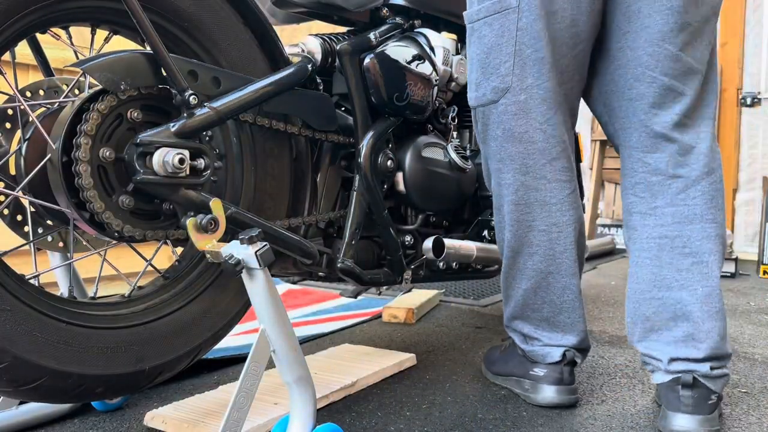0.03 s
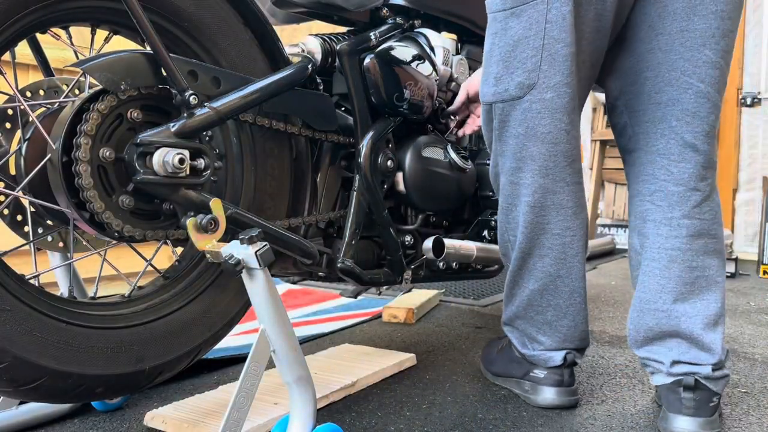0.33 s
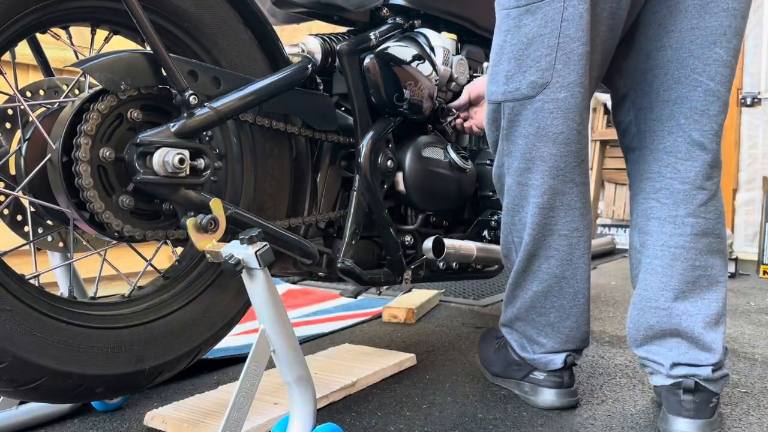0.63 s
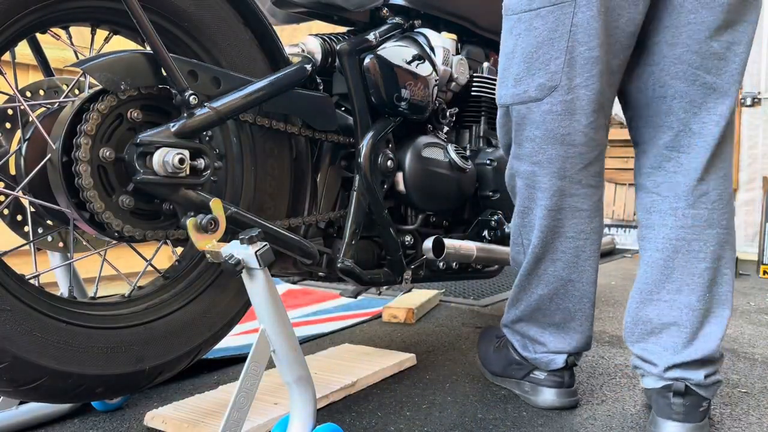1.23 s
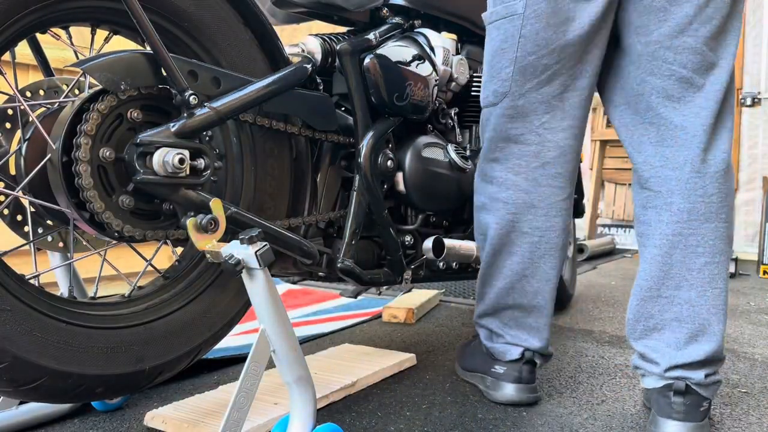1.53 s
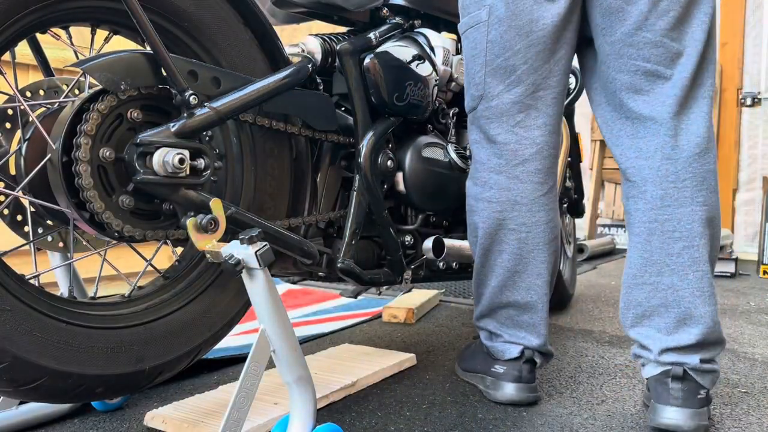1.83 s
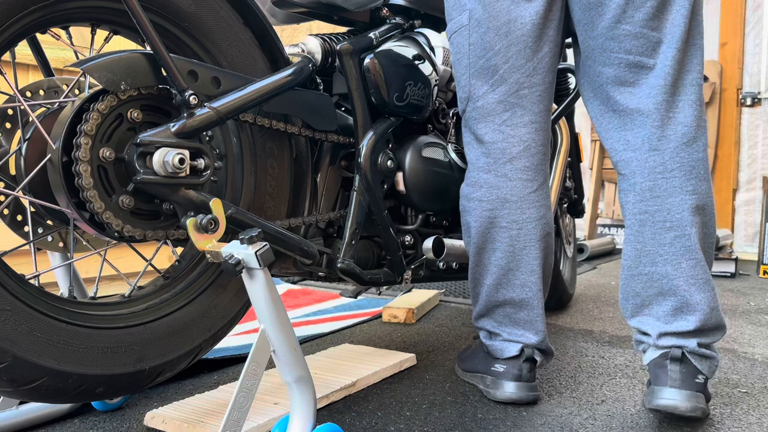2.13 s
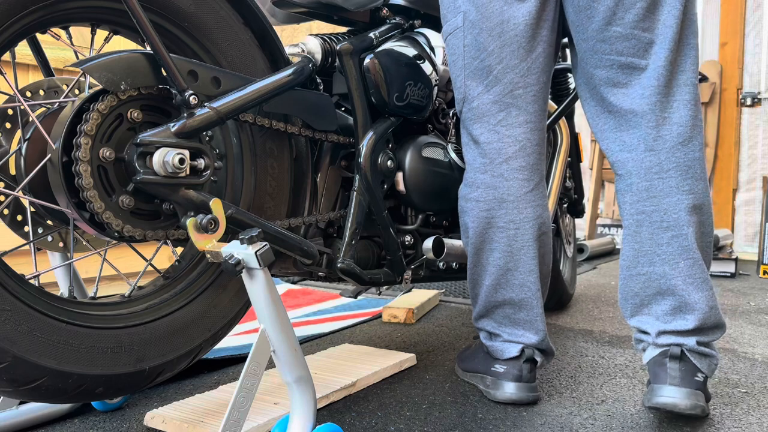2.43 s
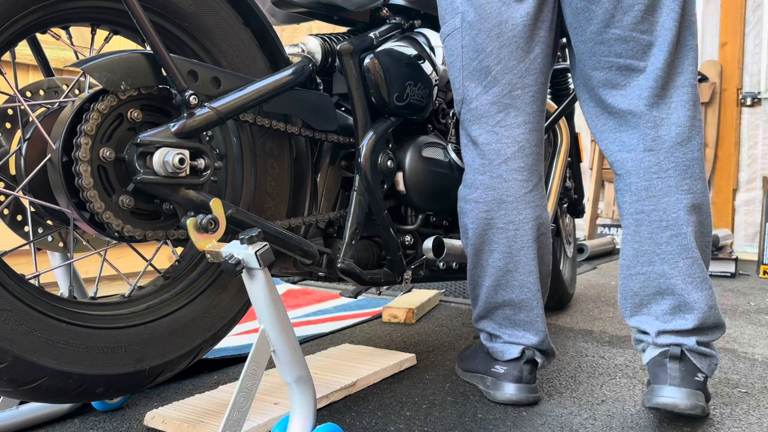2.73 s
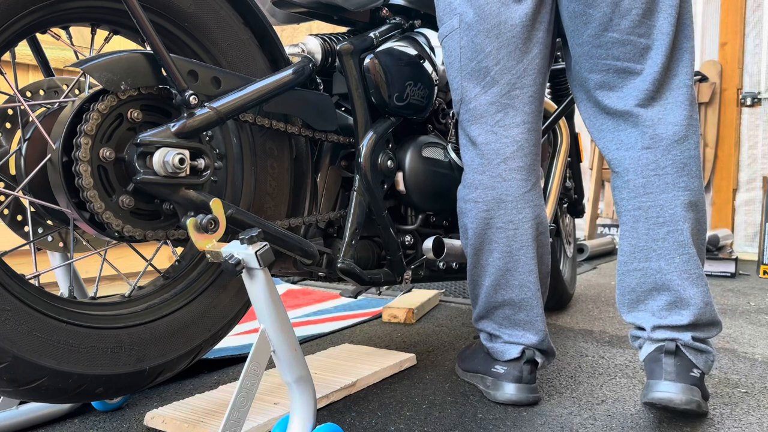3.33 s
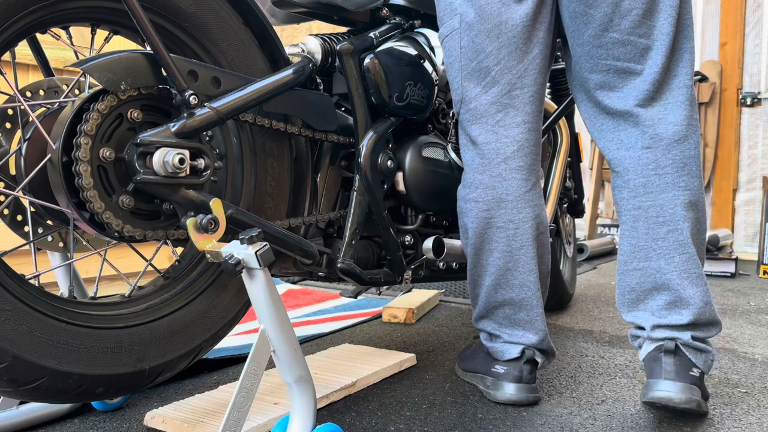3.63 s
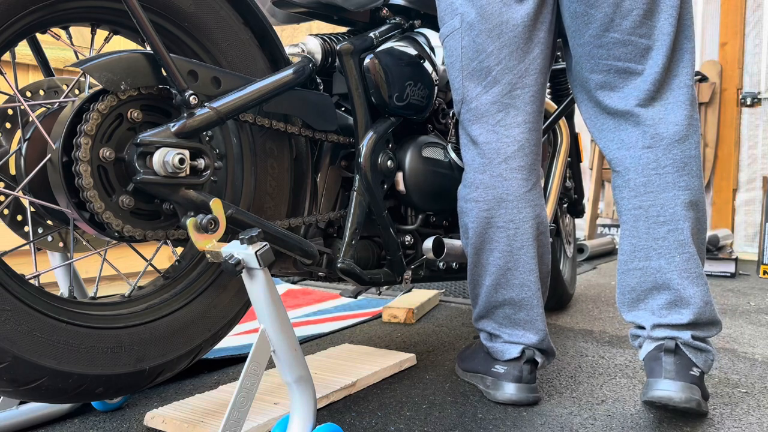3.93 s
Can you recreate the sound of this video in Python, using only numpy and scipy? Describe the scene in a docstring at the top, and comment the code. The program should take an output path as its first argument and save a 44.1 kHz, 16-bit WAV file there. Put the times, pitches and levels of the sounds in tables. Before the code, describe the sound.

A motorcycle is switched on, whirrs faintly with clicks, then its starter cranks loudly.

```python
"""A motorcycle switched on and cranked in a yard, a little left of a stereo microphone.
Key and relays click, the pump whirrs and the electrics whine. At 3.56 s the solenoid snaps in and the
starter gears grind against the casing, slowing on each compression, while the cylinders thump through
the pipes. Behind it are a low distant rumble, still air and two faint, far chirps."""
import sys
import numpy as np
from scipy import signal
from scipy.fft import rfft, irfft
from scipy.io import wavfile

SR = 44100
rng = np.random.default_rng(int(sys.argv[2]) if len(sys.argv) > 2 else 0)


def file_out(sig):
    """Save sig as 16-bit WAV at sys.argv[1]."""
    # one column per channel
    cols = np.atleast_2d(sig).T
    # limit, then scale
    lim = np.clip(cols, -1, 1)
    pcm = np.round(lim * 32767).astype(np.int16)
    wavfile.write(sys.argv[1], SR, pcm)


N = 176400
T, HZ = np.arange(N) / SR, np.fft.rfftfreq(2 * N, 1 / SR)
POWER_ON_S = 1.04


def amp(db):
    """Decibels to gain."""
    return 10 ** (np.asarray(db) / 20)


def unit(x):
    """Scales to rms 1."""
    return x / np.sqrt(np.mean(x ** 2) + 1e-20)


def curve(rows, column=1):
    """One column of a table through time."""
    rows = np.array(rows)
    return np.interp(T, rows[:, 0], rows[:, column])


def spectrum(rows, hz):
    """A table interpolated on a log-frequency axis."""
    freqs, values = np.transpose(rows)
    return np.interp(np.log(hz + 1), np.log(freqs + 1), values)


def shape(x, gain):
    """Filters by a frequency response."""
    return irfft(rfft(x, 2 * N) * gain)[..., :N]


def band(x, lo_hz, hi_hz):
    """Causal band-pass."""
    return signal.sosfilt(signal.butter(2, [lo_hz, hi_hz], 'band', fs=SR, output='sos'), x)


def wander(hz):
    """Random motion of rms 1, mostly slower than hz."""
    return unit(shape(rng.standard_normal(N), 1 / (1 + (HZ / hz) ** 4)))


def add(mix, start_s, sound):
    """Mixes a sound in at a time."""
    part = mix[round(start_s * SR):][:len(sound)]
    part += sound[:len(part)]


def wash(colour, alike_hz):
    """Diffuse noise, alike in both channels below alike_hz."""
    common, apart = rng.standard_normal((2, N))
    coherence = .25 + .75 / (1 + (HZ / alike_hz) ** 2)
    gain = amp(spectrum(colour, HZ))
    right = shape(common, gain * coherence) + shape(apart, gain * np.sqrt(1 - coherence ** 2))
    return unit(np.array([shape(common, gain), right]))


def yard(x, wet_db):
    """Direct sound from slightly left, quick reflections off bike and ground, and a short tail."""
    # reverberation of the yard: f/Hz, t60/s
    decay = [(100, 0.55), (500, 1), (2000, 0.51), (6000, 0.32), (14000, 0.32)]
    n, right_lag_s = SR // 2, 33e-6
    t = np.arange(n) / SR
    late, early = rng.standard_normal((2, 2, n)) * (rng.random((2, 2, n)) < .1) * (t > .002)
    hz, frame_s, frames = signal.stft(late, SR, nperseg=256)
    tail = signal.istft(frames * amp(-60 * frame_s / spectrum(decay, hz)[:, None]), SR, nperseg=256)[1]
    echo = (amp(wet_db) * unit(tail[:, :n]) + amp(-5) * unit(early * np.exp(-t / .016))) / np.sqrt(n)
    direct = np.array([x, shape(x, np.exp(-2j * np.pi * np.minimum(HZ, 8000) * right_lag_s))])
    return (direct + signal.fftconvolve(x[None], echo, axes=1)[:, :N]) * amp([[1], [-1]])


def background():
    """A distant rumble that dips briefly twice, under the soft hiss of still air."""
    # course of the rumble: t/s, level/dB
    rumble_level = [(0, -44), (.85, -47.5), (1.5, -48), (1.95, -49.5), (2.15, -47.5), (2.21, -56),
                    (2.3, -45.5), (2.7, -48.5), (2.77, -56.5), (3.38, -51), (3.45, -46)]
    # spectra of rumble and air: f/Hz, level/dB
    rumble_colour = [(20, -37), (36, 1), (54, 15.5), (70, 9), (88, 8), (120, -4.5), (200, -32), (400, -90)]
    air_colour = [(76, -10), (130, 0), (412, -7.5), (554, -13), (1130, -15.5), (1440, -18), (3450, -29),
                  (4210, -39), (6780, -27), (15000, -45)]
    rumble = wash(rumble_colour, alike_hz=850) * amp(curve(rumble_level))
    return rumble + wash(air_colour, alike_hz=413) * amp(-59.5 + .5 * wander(12))


def clicks():
    """Key, relays, solenoid and dull knocks: bursts of contact noise, each with one resonance."""
    # contacts: t/s, bass/dB, middle/dB, treble/dB, t60/s, ring/Hz, ring/dB
    contacts = [(.167, -78, -74, -55, 0.0093, 8500, -46), (.541, -60.5, -61.5, -62.5, 0.13, 3050, -65),
                (.6745, -53, -40, -39, 0.036, 4020, -39), (.679, -54, -65, -48, 0.065, 990, -45.5),
                (1.037, -59, -49, -43, 0.024, 8700, -35.5), (1.131, -51.5, -47, -43.5, 0.15, 1465, -48),
                (1.222, -41, -46, -63, 0.072, 452, -37.5), (1.471, -57.5, -65, -52, 0.085, 3460, -71),
                (2.547, -46, -56, -77, 0.11, 684, -44), (3.103, -56.5, -53.5, -57.5, 0.15, 778, -59),
                (3.447, -56.5, -51, -44.5, 0.035, 9400, -44.5),
                (3.5595, -32.5, -26.5, -23, 0.032, 5570, -15)]
    out, t, rise_s = np.zeros(N), np.arange(SR // 4) / SR, .0016
    for start_s, bass_db, mid_db, top_db, t60, hz, ring_db in contacts:
        bands = [(250, 1100, bass_db), (1200, 4500, mid_db), (5000, 14500, top_db),
                 (hz * .9, hz * 1.1, ring_db)]
        burst = sum(amp(db) * unit(band(rng.standard_normal(len(t)), lo, hi)) for lo, hi, db in bands)
        add(out, start_s, burst * np.minimum(t / rise_s, 1) * amp(-60 * t / t60))
    return yard(out, wet_db=-7)


def birds():
    """Far, reverberant chirps, each arching in pitch and level."""
    # calls: t/s, length/s, f/Hz, level/dB
    chirps = [(0.255, 0.086, 3540, -79), (0.768, 0.014, 3430, -61)]
    out = np.zeros(N)
    for start_s, length_s, hz, db in chirps:
        arch = np.sin(np.pi * np.arange(0, length_s, 1 / SR) / length_s)
        cycles = np.cumsum(hz * (.97 + .04 * arch)) / SR
        add(out, start_s, amp(db) * arch * np.sin(2 * np.pi * cycles))
    return yard(out, wet_db=1)


def pump():
    """The pump's fluttering whirr, which dies away as the starter engages."""
    # course of the whirr: t/s, level/dB
    level = [(1.03, -71), (1.07, -58.5), (1.25, -52.5), (1.5, -55.5), (2.4, -57), (3.43, -58),
             (3.54, -60.5), (3.6, -112)]
    # spectrum of the whirr: f/Hz, level/dB
    colour = [(350, -75), (850, -1.5), (1250, -12.5), (1850, -1.5), (2400, -7), (3700, 0), (4200, -6.5),
              (5500, -7), (8200, -14.5), (9500, -6.5), (11000, -23), (16000, -8)]
    return wash(colour, alike_hz=870) * amp(curve(level) + .44 * wander(110))


def electrics():
    """A thin, sagging whine whose partials waver separately in each channel."""
    # course of the whine: t/s, f/Hz, level/dB
    whine = [(1.04, 1823, -73), (1.22, 1788, -63.5), (1.8, 1762, -61.5), (2.4, 1766, -62.5),
             (2.9, 1759, -63.5), (3.42, 1748, -66.5), (3.5, 1730, -102)]
    # its partials: multiple of f, level/dB
    partials = [(.5, -11), (1, -2), (2.125, -12), (2.936, -3), (5.872, -16), (8.81, -2)]
    cycles = np.cumsum(curve(whine) * (1 + .00095 * wander(70))) / SR
    tones = [sum(amp(db + 3.2 * wander(4)) * np.cos(2 * np.pi * k * cycles) for k, db in partials)
             for channel in range(2)]
    return np.array(tones) * amp(curve(whine, column=2)) * (T > POWER_ON_S)


def servo():
    """A small motor winds up in one faint, unsteady tone."""
    # motor tone: t/s, f/Hz, level/dB
    glide = [(1.42, 1740, -84), (1.53, 1827, -73), (1.7, 2130, -80), (1.8, 2200, -90)]
    cycles = np.cumsum(curve(glide) * (1 + .0106 * wander(106))) / SR
    return np.cos(2 * np.pi * cycles) * amp(curve(glide, column=2)) * (T > POWER_ON_S)


def starter():
    """Meshing teeth and their rattle ring the casing, louder and brighter under compression."""
    # starter speed: t/s, tooth rate/Hz
    speed = [(3.56, 250), (3.6, 695), (3.615, 722), (3.624, 940), (3.645, 968), (3.653, 1140), (3.68, 1160),
             (3.711, 1430), (3.747, 1450), (3.768, 1260), (3.78, 1160), (3.82, 1150), (3.875, 1590),
             (3.903, 1410), (3.918, 1250), (3.945, 1200), (3.985, 1610), (4.0, 1520)]
    # load on the gears: t/s, level/dB
    load = [(3.56, -32.5), (3.58, -22), (3.605, -17), (3.665, -22), (3.68, -33.5), (3.708, -47),
            (3.717, -14.5), (3.745, -24.5), (3.772, -13.5), (3.79, -37), (3.83, -48), (3.872, -29.5),
            (3.883, -19), (3.912, -21.5), (3.93, -28), (3.96, -42), (3.984, -37), (3.992, -20),
            (4.0, -16.5)]
    # treble against the rest: t/s, level/dB
    treble = [(3.58, -3), (3.61, -10), (3.66, 5), (3.71, -12.5), (3.73, 2), (3.765, 3), (3.81, 0.5),
              (3.865, -7), (3.886, 2.5), (3.913, 6.5), (3.97, -6.5), (4.0, 3.5)]
    # gear tones: multiple of the tooth rate, level/dB
    orders = [(1, 2), (1.2, -3), (2, -1), (3, -6), (4, -1), (5, -1), (6, -5), (7, -10), (8, -12)]
    # colour of the engine casing and covers: f/Hz, level/dB
    casing = [(150, -10), (320, -10), (450, -4), (720, -8.5), (1100, 2), (1450, 0.5), (2050, 0), (2700, 3),
              (3300, -6), (4300, -4), (5100, -10.5), (5800, -0.5), (6450, 5), (7400, -1), (9300, -1),
              (10200, -11), (11000, -22), (15000, -16.5)]
    # casing resonances: f/Hz, width/Hz, level/dB
    rings = [(1155, 25, -2), (1450, 28, 1), (1900, 28, 3), (2312, 32, 0), (2720, 35, -5), (4300, 70, -3),
             (5728, 32, 2), (6176, 16, 3), (6368, 28, 0), (9400, 55, -2)]
    gear_db, rattle_db, grit_db, jitter, singing_hz, treble_hz = -1.5, -3, 2, .0093, 900, 2640
    engaged = T > speed[0][0]
    teeth = np.cumsum(curve(speed) * (1 + jitter * wander(300))) / SR
    gears = sum(amp(db) * (1 + .41 * wander(72)) * np.cos(2 * np.pi * (k * teeth + rng.random()))
                for k, db in orders)
    gears *= np.minimum(curve(speed) / singing_hz, 1) ** 2  # slow teeth only rattle; fast ones sing
    rattle = rng.standard_normal(N) * (.5 + np.exp(-2 * (teeth % 1))) * amp(grit_db * wander(330))
    ringing = 1 + sum(amp(db) / (1 + 2j * (HZ - hz) / width) for hz, width, db in rings)
    body = amp(spectrum(casing, HZ)) * ringing * HZ ** 2 / (HZ ** 2 + 120 ** 2)
    gears, rattle = shape(gears, body), shape(rattle, body)
    grind = amp(gear_db) * gears / np.std(gears[engaged]) + amp(rattle_db) * rattle / np.std(rattle[engaged])
    low = shape(grind, 1 / (1 + (HZ / treble_hz) ** 8))
    grind = low + (grind - low) * amp(curve(treble))
    return yard(grind * amp(curve(load)) * engaged, wet_db=-4.5)


def cylinders():
    """Each gulp of gas rushes in and runs up and down the ringing pipe, weaker and duller each trip."""
    # cylinder pulses: t/s, level/dB, width/s, pipe pitch/Hz, share echoed, push 1 or pull -1
    pulses = [(3.7116, -20.5, 0.0018, 95, 0.13, -1), (3.7182, -14, 0.0026, 82.2, 0.78, 1),
              (3.757, -14, 0.0026, 63.5, 0.38, -1), (3.871, -3.5, 0.0029, 60.5, 0.72, -1),
              (3.9985, -4, 0.0034, 62, .6, -1)]
    # pipe resonances: f/Hz, width/Hz, level/dB
    rings = [(189.4, 25, 11.5), (452, 24, 14.5)]
    dull_hz, notch_hz, notch_q = 423, 131, 4.3
    gulp_db, gulp_lead_s, gulp_s = -21.5, .0066, .014
    thumps, gulps = np.zeros((2, N))
    for at_s, db, width_s, hz, echoed, sign in pulses:
        u = (T - at_s) / width_s
        pulse = sign * amp(db) * (1 - u * u) * np.exp(-u * u / 2)
        round_trip = echoed * np.exp(-2j * np.pi * HZ / hz - (HZ / dull_hz) ** 2)
        thumps += shape(pulse, 1 / (1 - round_trip))
        gulps += amp(db + gulp_db) * np.exp(-abs(T - at_s + gulp_lead_s) / gulp_s)
    pipe = 1 + sum(amp(db) / (1 + 1j * (HZ ** 2 - hz ** 2) / (width * HZ + 1)) for hz, width, db in rings)
    rush = unit(band(shape(rng.standard_normal(N), pipe), 110, 393)) * gulps
    detuning = 1j * notch_q * (HZ / notch_hz - notch_hz / (HZ + 1))
    notch = detuning / (1 + detuning)
    low_cut = HZ ** 4 / (HZ ** 4 + 36 ** 4)
    thumps = shape(thumps, pipe * notch * low_cut)
    return thumps + yard(rush + amp(-18) * thumps, wet_db=-10)


def scene():
    """The motorcycle and its surroundings as they reach the microphone."""
    motorcycle = starter() + cylinders() + clicks() + electrics() + servo() + pump()
    return motorcycle + background() + birds()


def record(dry):
    """The recorder's band limit at 15.9 kHz."""
    return signal.oaconvolve(dry, signal.firwin(511, 15900, window=("kaiser", 9), fs=SR)[None], "same")


dry = scene()
out = record(dry)
file_out(out)
```